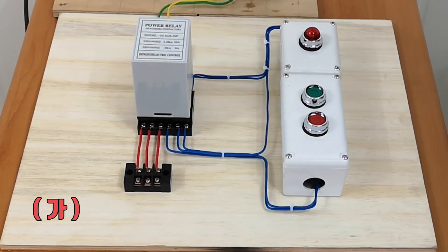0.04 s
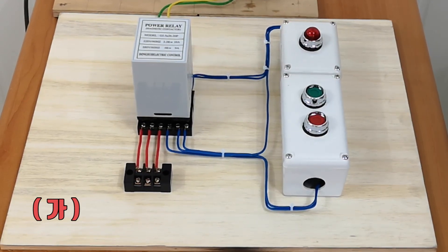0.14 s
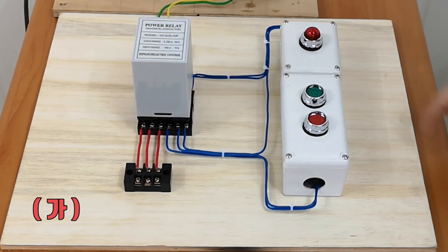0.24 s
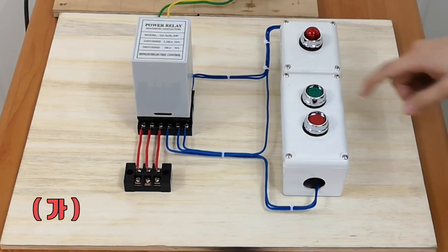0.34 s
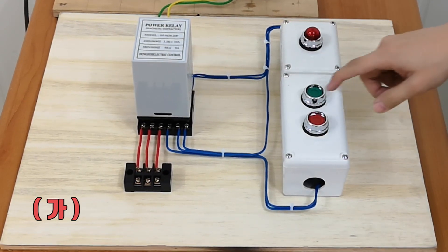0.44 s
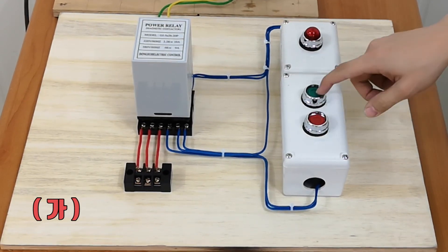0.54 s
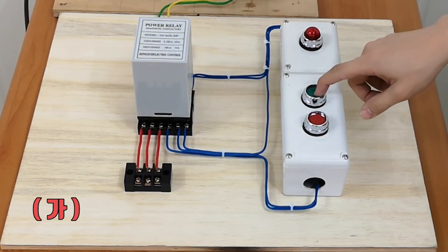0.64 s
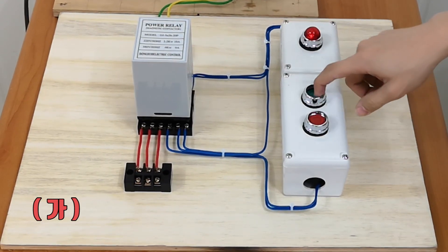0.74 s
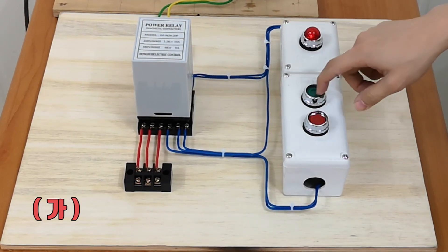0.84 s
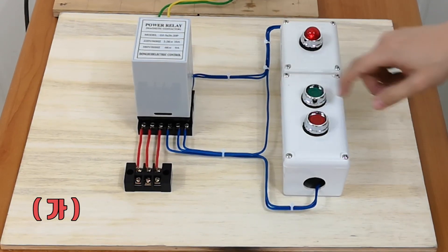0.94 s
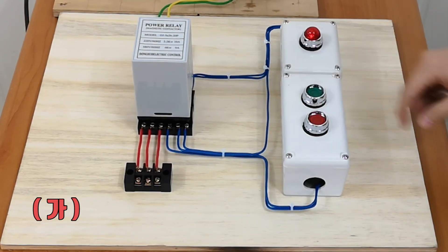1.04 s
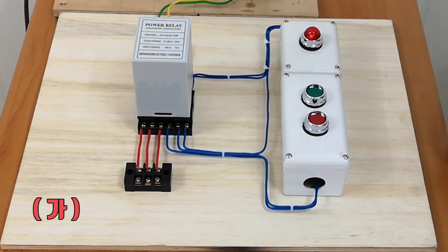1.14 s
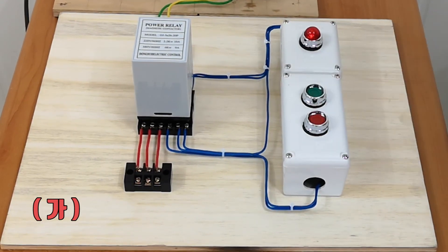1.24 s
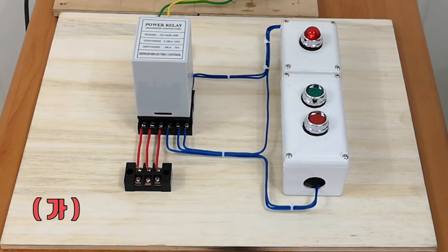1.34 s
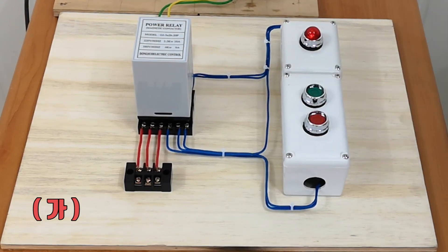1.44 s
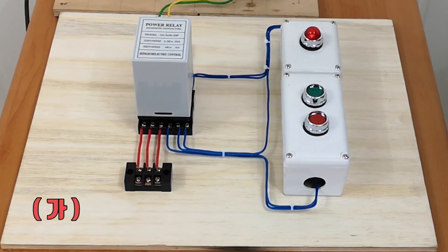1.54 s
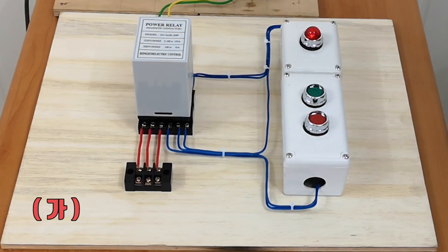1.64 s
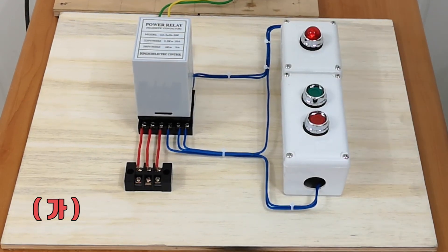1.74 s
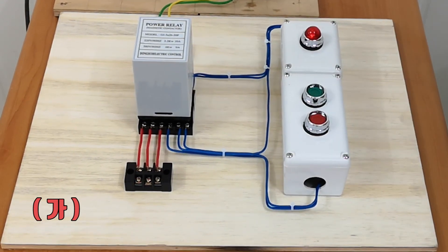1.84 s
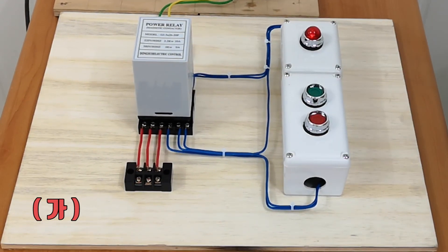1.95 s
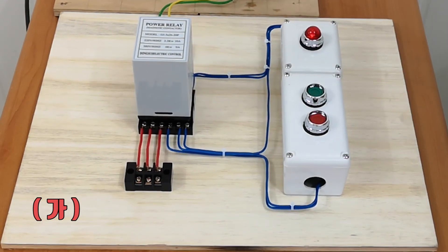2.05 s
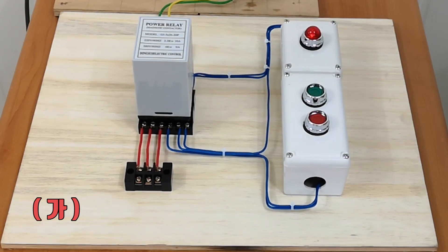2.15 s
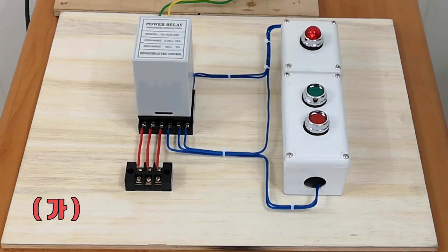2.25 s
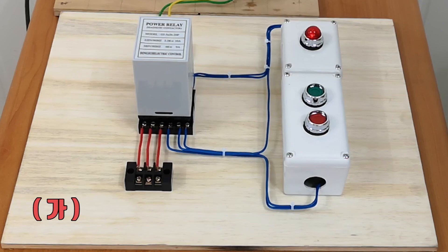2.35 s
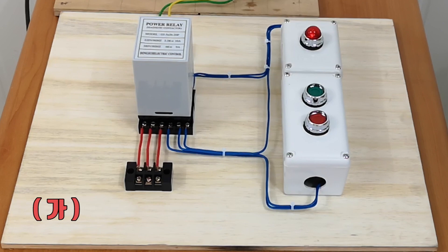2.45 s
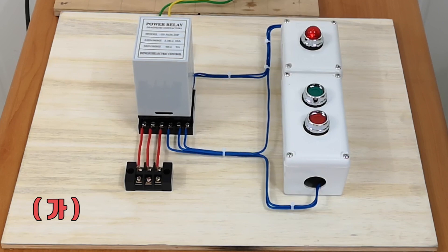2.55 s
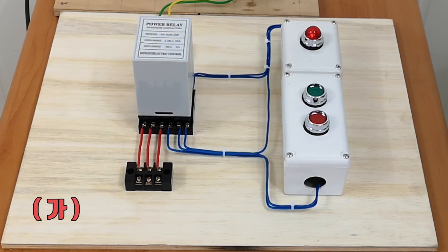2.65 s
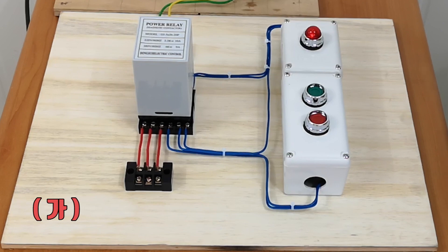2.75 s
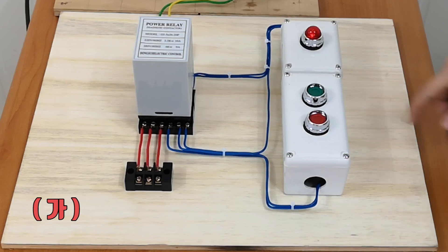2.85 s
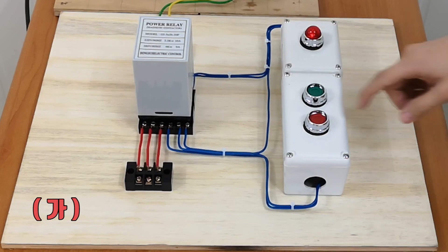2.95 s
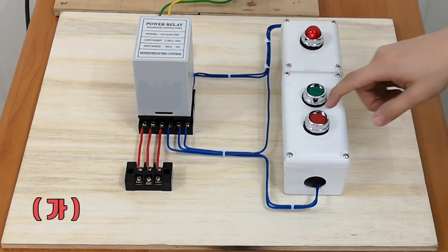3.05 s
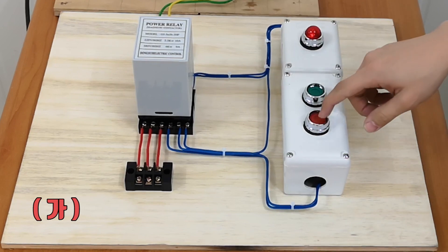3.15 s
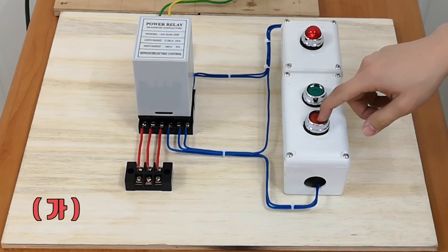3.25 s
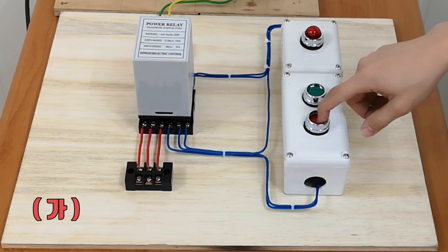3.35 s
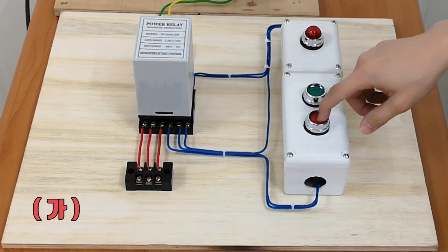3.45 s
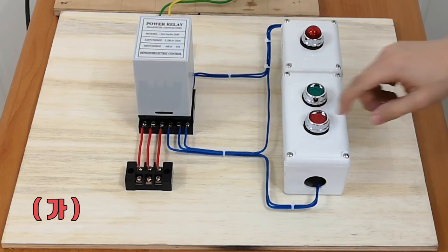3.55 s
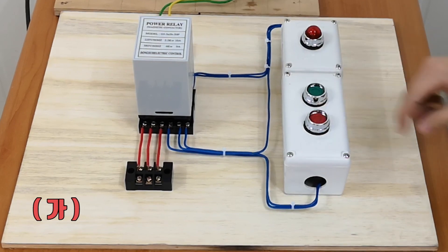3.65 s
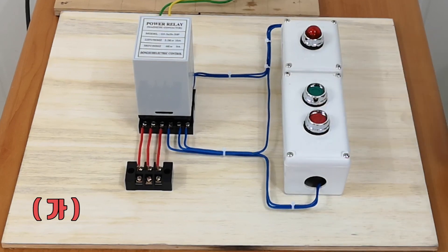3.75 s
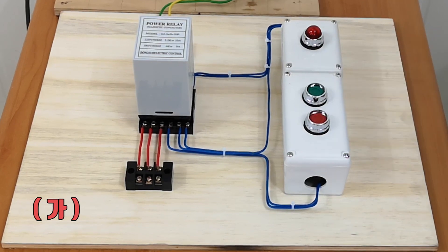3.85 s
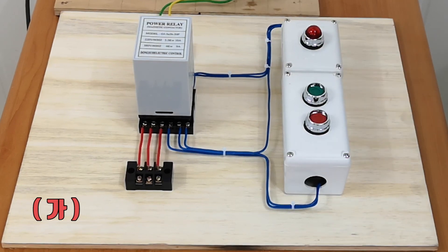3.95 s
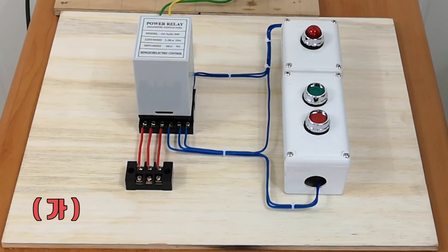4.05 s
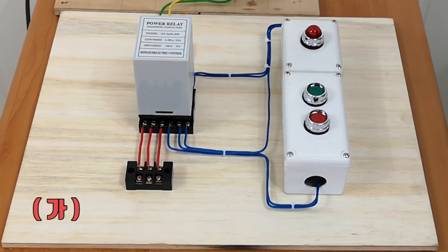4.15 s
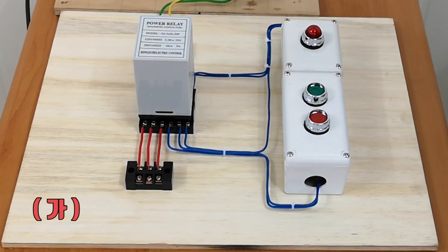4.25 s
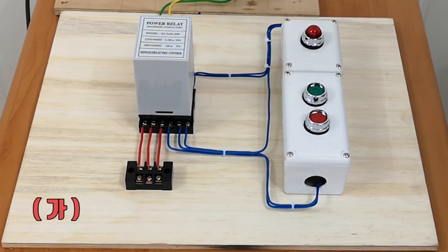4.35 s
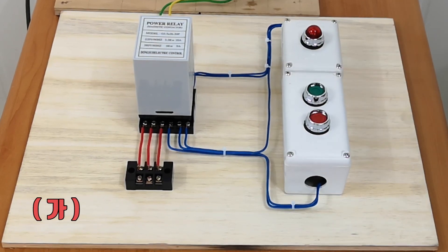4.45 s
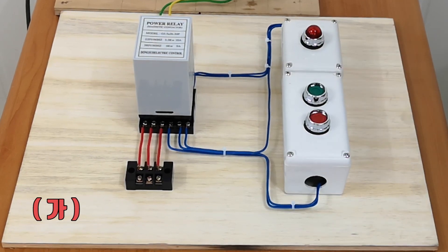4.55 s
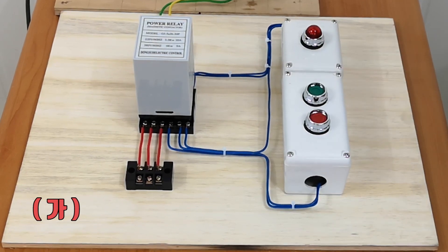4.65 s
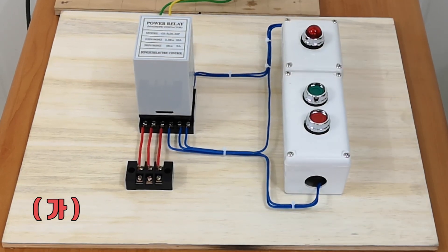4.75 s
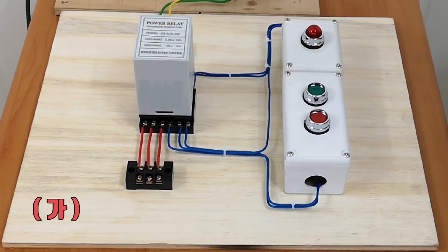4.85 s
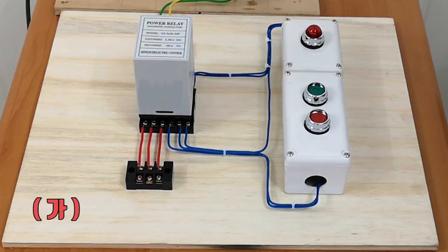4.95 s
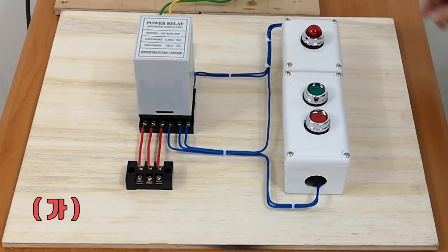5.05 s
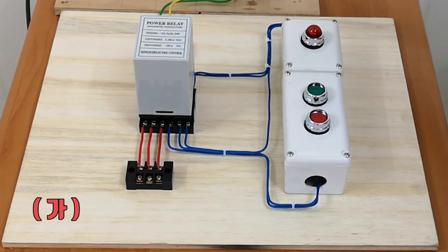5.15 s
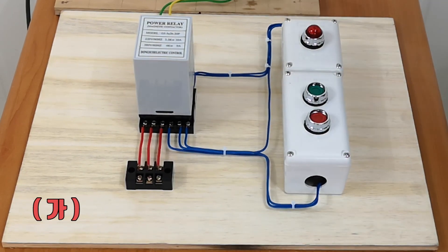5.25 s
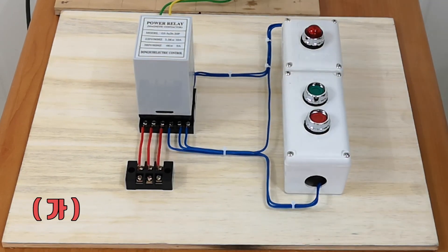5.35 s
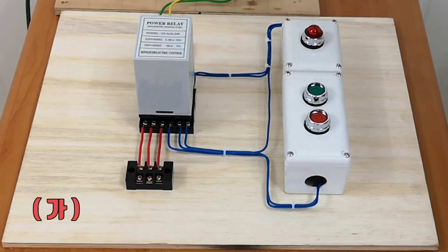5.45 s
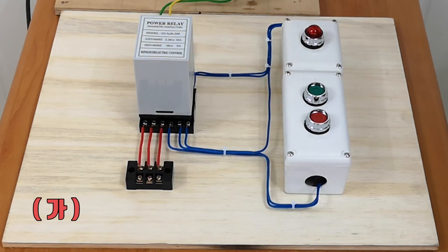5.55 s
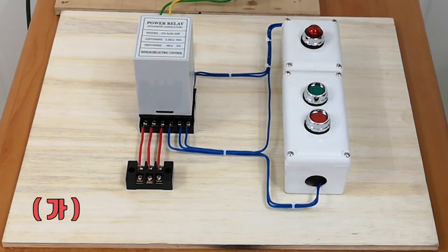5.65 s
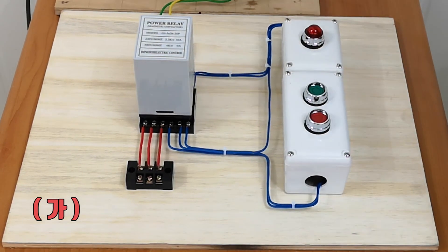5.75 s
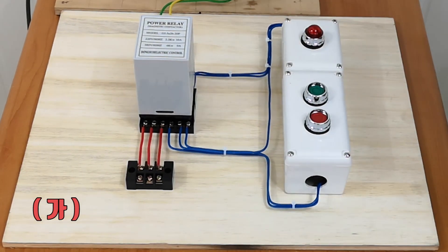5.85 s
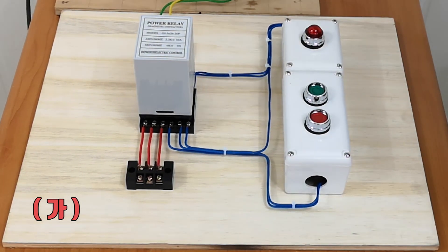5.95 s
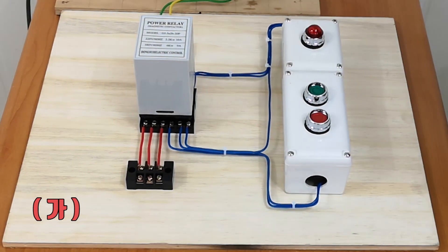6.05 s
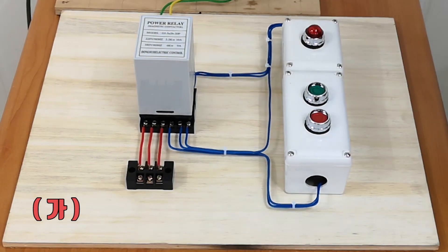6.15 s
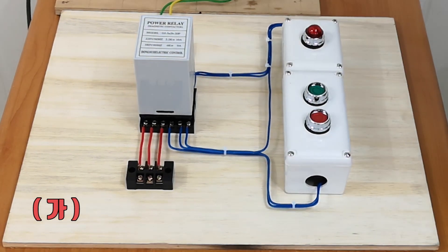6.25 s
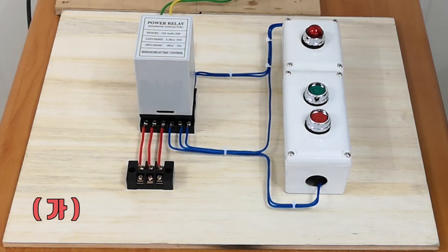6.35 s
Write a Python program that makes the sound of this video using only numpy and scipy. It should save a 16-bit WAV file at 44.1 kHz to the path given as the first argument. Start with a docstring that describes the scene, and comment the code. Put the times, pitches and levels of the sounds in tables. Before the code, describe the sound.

A push button ticks and a power relay pulls in with a loud, solid clack that thumps its wooden board; the button clicks back. After a pause, a second press drops the relay out with a brighter, rattling clack, followed by a springy snap. One more sharp click comes near the end. The sounds are close, with a short echo in a bare room over faint ventilation and electrical hum.

```python
"""Sharp clicks and clacks ring out in a bare room as two push buttons switch a power relay on and off.
Each impact excites the modes of three bodies: the plywood board thumps, the plastic case rattles and
small steel parts ring. On release, the buttons snap back on their springs.
Mains hum and ventilation lie underneath, and the recorder's noise suppressor shortens the echoes."""
import sys
import numpy as np
from scipy import signal
from scipy.fft import rfft, irfft
from scipy.io import wavfile
from scipy.ndimage import uniform_filter1d

SR = 44100
rng = np.random.default_rng(int(sys.argv[2]) if len(sys.argv) > 2 else 0)


def generate_wav(signal):
    """Clip the signal to [-1, 1] and save it as 16-bit WAV at the path in sys.argv[1]."""
    frames = np.transpose(np.atleast_2d(signal))
    scaled = np.clip(frames, -1, 1) * 32767
    pcm = np.round(scaled).astype(np.int16)
    wavfile.write(sys.argv[1], SR, pcm)


N = 282274
T = np.arange(N) / SR
RING_T = np.arange(SR // 5) / SR
SUPPRESS_DB = 7.5


def armature(slide_step_s=.0075, thud_lag_s=.0057, bounce_s=.0135, bounce_fall_db=1.6):
    """Inelastic collision: the armature slides, hits its stop and bounces, less when the magnet holds."""
    # pull-in, then drop-out: impact_s, slide_s, board_db, case_db, steel_db, tilt_db_per_octave, bounce_db
    strokes = [(0.8468, .0225, 3, -0.5, -7.5, -1.5, -20), (3.4069, .008, -8, -1.5, -12.5, 2.5, -4.5)]
    # contact spring modes: pitch_hz, level_db, t60_s
    blade_modes = [(655.4, -2.5, .2), (2170, 0, .2), (2470, -0.5, 0.25), (2676, -2, .2), (13020, -15, .07)]
    out = np.zeros((2, N))
    for impact_s, slide_s, board_db, case_db, steel_db, tilt_db, bounce_db in strokes:
        levels_db = np.array([board_db, case_db, steel_db])
        for k in range(round(slide_s / slide_step_s)):  # chatter along the guides
            chatter = blow(steel_db + np.array([-13, -1.5, -18]), tilt_db, rise_s=.004)
            add(out, impact_s - slide_s + k * slide_step_s, chatter)
        add(out, impact_s, blow(levels_db + (-3, -4.5, 0), tilt_db, rise_s=.002))  # steel meets steel
        thud_s = impact_s + thud_lag_s  # case and board take up the blow
        add(out, thud_s, blow(levels_db + (.5, 0, -9.5), tilt_db, rise_s=.0033))
        first_bounce_db = levels_db + (-2, -.5, -2.5) + bounce_db
        for k in range(4):
            bounce = blow(first_bounce_db - k * bounce_fall_db, tilt_db, rise_s=.004)
            add(out, thud_s + (k + 1) * bounce_s, bounce)
        add(out, thud_s + bounce_s, undb(bounce_db - 9) * ring(blade_modes, RING_T, spread=.3))
    return out


def button_snaps(rebound_s=.009):
    """Release of elastic energy: a button slips its catch, flies to its stop and rebounds once."""
    # double clicks: start_s, flight_s, catch_db (case), then at the stop:
    # board_db, case_db, steel_db, tilt_db_per_octave, spring_db
    snaps = [ (.9315, .0095, -26, -17, -6, -4, -3.5, -7.5), (3.5730, .0085, -14, -19, -8, -0.5, -.8, -5),
             (6.3532, .0060, -5.5, -15.5, -7.5, -4, 2.5, -16), ]
    out = np.zeros((2, N))
    for start_s, flight_s, catch_db, board_db, case_db, steel_db, tilt_db, spring_db in snaps:
        catch = blow((board_db - 9.5, catch_db, steel_db - 9), tilt_db + 1.5, rise_s=.0032)
        add(out, start_s, catch + return_spring(spring_db - 7))
        stop_db = np.array([board_db, case_db, steel_db])
        stop = blow(stop_db, tilt_db, rise_s=.002)
        add(out, start_s + flight_s, stop + return_spring(spring_db))
        rebound = blow(stop_db + (-3.5, -6, -10.5), tilt_db, rise_s=.0015)
        add(out, start_s + flight_s + rebound_s, rebound)
    return out


def button_presses(scrape_lag_s=.0089, plunger_s=.7855, plunger_db=-24):
    """Stick-slip friction: a pushed button ticks, then scrapes on; the start button's plunger rings."""
    # slips under the finger: start_s, level_db, tilt_db_per_octave
    ticks = [(.7210, -34.5, -3.5), (.7650, -33, -3), (0.7834, -23, 1.5), (.8180, -22.5, -1.5),
             (3.3729, -26, 0.5), (6.3505, -22, -1)]
    # modes of the plunger, excited as it passes its catch: pitch_hz, level_db, t60_s
    plunger_modes = [(1538, 0.5, 0.1), (1620, -5, 0.099), (5050, -4.5, .06), (5180, -4.5, .05),
                     (6800, -7, .05), (8230, -5.5, 0.058)]
    out = np.zeros((2, N))
    for start_s, level_db, tilt_db in ticks:
        tick = blow(level_db + np.array([-13.5, -7.5, 1.5]), tilt_db, rise_s=.001)
        scrape = blow(level_db + np.array([-15, -5, -6.5]), tilt_db, rise_s=.0044)
        add(out, start_s, tick)
        add(out, start_s + scrape_lag_s, scrape)
    add(out, plunger_s, undb(plunger_db) * ring(plunger_modes, RING_T, spread=.3))
    return out


def return_spring(level_db, left_right_db=(-4.5, 1.5)):
    """Free vibration: a plucked return spring rings high and to the right."""
    # spring modes: pitch_hz, level_db, t60_s
    modes = [(7290, -4, .08), (9360, -2, 0.02), (9260, 3, 0.035), (9730, 0, 0.045)]
    return undb(level_db) * undb(left_right_db)[:, None] * ring(modes, RING_T, scatter=.0012, spread=1)


def blow(levels_db, tilt_db, rise_s):
    """Impact excitation: one blow sets three bodies vibrating, at levels_db = (board, case, steel)."""
    # modes of plywood board, plastic case, and steel armature and blades: pitch_hz, level_db, t60_s
    board_modes = [(84.55, -12.5, 0.092), (174, -2, 0.062), (222.8, -6, 0.21), (318, -4.5, 0.046)]
    case_modes = [(652, -4.5, 0.023), (879, -3, 0.058), (1177, -3.5, 0.045), (1293, 1.5, 0.036),
                  (1592, -6, 0.087), (1794, -4.5, 0.086), (1960, 0, .04), (2293, -7.5, .04),
                  (3170, -13, .03)]
    steel_modes = [(7340, -2.5, 0.031), (7680, -3, .025), (7920, 0, 0.027), (8540, -7.5, 0.011),
                   (9244, -9.5, .02)]
    # spectra of their dense, quickly damped vibration: frequency_hz, density_db
    case_spectrum = [(100, -7.5), (300, 2), (480, -6.5), (900, -2.5), (1500, 0.5), (2300, -2.5),
                     (3000, -9.5), (4500, -17), (7000, -24.5), (15000, -46)]
    steel_spectrum = [(500, -29), (2500, -12), (4000, -7.5), (6000, -6), (7700, -1), (9500, -2),
                      (10100, -7.5), (12000, -19), (14500, -19.5), (16000, -25)]
    rise = 1 - np.exp(-RING_T / rise_s)  # sliding parts meet gradually
    board = ring(tilted(board_modes, 2.4 * tilt_db), RING_T)
    case_crack = crack(tilted(case_spectrum, tilt_db), t60_s=.028, tail_db=-15, tail_t60_s=.1)
    case_ring = ring(tilted(case_modes, tilt_db), RING_T, scatter=.0073, spread=.2)
    case = unit(rise * (case_crack + undb(-5) * case_ring))
    steel_crack = crack(tilted(steel_spectrum, tilt_db), t60_s=.029, tail_db=-17, tail_t60_s=.084)
    steel_ring = ring(tilted(steel_modes, tilt_db), RING_T, scatter=.014, spread=.94)
    steel = unit(rise * (steel_crack + undb(-5) * steel_ring))
    return sum(gain * part for gain, part in zip(undb(levels_db), (board, case, steel)))


def ring(modes, t, scatter=0, spread=0):
    """Modal superposition: damped sines; scatter detunes them, spread varies their phase per channel."""
    out = 0
    for pitch_hz, level_db, t60_s in modes:
        detuned_hz = pitch_hz * (1 + scatter * rng.standard_normal())
        phase = spread * rng.uniform(-np.pi, np.pi, (2, 1))
        mode = np.sin(2 * np.pi * detuned_hz * t + phase) * undb(-60 * t / t60_s)
        out = out + undb(level_db) * unit(mode)
    return unit(out)


def crack(spectrum, t60_s, tail_db, tail_t60_s):
    """Modal overlap: dense modes merge into a noise burst, with a tail scattered off board and bench."""
    envelope = undb(-60 * RING_T / t60_s) + undb(tail_db - 60 * RING_T / tail_t60_s)
    return unit(colour(diffuse(len(RING_T), alike_hz=2500) * envelope, spectrum))


def tilted(table, tilt_db):
    """Spectral tilt in dB per octave: hard blows favour the upper modes, dull blows the lower."""
    return [(hz, db + tilt_db * np.log2(hz / table[0][0]), *rest) for hz, db, *rest in table]


def board_radiation(x, cutoff_hz=72):
    """Radiation efficiency: a board small against the wavelength gives off no deep bass."""
    return signal.sosfilt(signal.butter(4, cutoff_hz, "highpass", fs=SR, output="sos"), x)


def room(x, build_s=.012):
    """Reverberation: echoes thicken after a blow and die away, treble first; standing waves sing on."""
    # diffuse echoes against the direct sound: frequency_hz, level_db, t60_s
    bands = [(80, 0.5, 0.71), (177, -4.5, 1.4), (355, 2, 1), (600, 7, 0.78), (1196, 1, 0.94),
             (2200, 1.5, 0.98), (4500, -2.5, 0.72), (8040, -6.5, 0.46), (15000, -10, 0.39)]
    # standing waves: pitch_hz, level_db, t60_s
    room_modes = [(90.8, -5.5, .6), (132, -1.5, 0.98), (157, -4.5, 0.91), (202.3, 3.5, 0.92),
                  (216, -5.5, 1), (300, -11.5, 0.96), (316, -5.5, .8), (350, -9.5, 1), (651, -7.5, .8),
                  (1128, -5, 0.64)]
    size = 3 * SR // 2
    t, f = np.arange(size) / SR, np.fft.rfftfreq(size, 1 / SR)
    noise = rfft(diffuse(size, alike_hz=560.4))
    log_centres = np.log([row[0] for row in bands])
    response = undb(-17) * ring(room_modes, t)
    for (_, level_db, t60_s), band_weights in zip(bands, np.eye(len(bands))):
        band = irfft(noise * np.interp(np.log(f + 1), log_centres, band_weights), size)
        envelope = (1 - np.exp(-(t / build_s) ** 2)) * undb(-60 * t / t60_s)
        response = response + undb(level_db) * band * unit(envelope)
    return signal.fftconvolve(x, response, axes=1)[:, :N]


def ventilation(level_db=-58):
    """Broadband noise: moving air rumbles and hisses at a slowly wavering level."""
    # air noise spectrum: frequency_hz, density_db
    spectrum = [(10, -8.5), (25, 1.5), (82, -3.5), (128, -12), (200, -18), (270, -21.5), (390, -29),
                (555, -34), (1020, -32), (2400, -32), (4000, -40.5), (8000, -45), (11500, -51),
                (15000, -66)]
    air = unit(colour(diffuse(N, alike_hz=615), spectrum)) * np.sqrt(N)
    return air * undb(level_db + .5 * drift(1.9))


def mains_hum(waver_db=1.0, wander_rad=.18):
    """Line spectrum: hum partials and faint whines, each wavering gently in level and phase."""
    # steady tones: pitch_hz, level_db
    tones = [(118.4, -71.5), (236.5, -74), (357, -88), (470, -92), (1017, -93.5), (1798, -92.5),
             (2530, -95.5), (7822, -102)]
    hum = 0
    for pitch_hz, level_db in tones:
        amplitude = np.sqrt(2) * undb(level_db + waver_db * drift(7.2))
        hum = hum + amplitude * np.sin(2 * np.pi * pitch_hz * T + wander_rad * drift(1.4))
    return hum


def diffuse(size, alike_hz):
    """Diffuse-field coherence: noise at two microphones is alike in the bass, unrelated in the treble."""
    f = np.fft.rfftfreq(size, 1 / SR)
    coherence = np.sinc(f / alike_hz) / (1 + (f / alike_hz / 2) ** 2)
    mid, side = rfft(rng.standard_normal((2, size)))
    mid, side = mid * np.sqrt((1 + coherence) / 2), side * np.sqrt((1 - coherence) / 2)
    return irfft(np.array([mid + side, mid - side]), size)


def colour(x, points):
    """Minimum-phase filtering through points of frequency_hz, gain_db."""
    size = 2 * x.shape[-1]
    hz, db = np.transpose(points)
    f = np.fft.rfftfreq(size, 1 / SR)
    gain = undb(np.interp(np.log(f + 1), np.log(hz), db))
    cepstrum = irfft(np.log(gain))
    cepstrum[1:size // 2] *= 2  # folding the cepstrum makes the filter causal
    cepstrum[size // 2 + 1:] = 0
    return irfft(rfft(x, size) * np.exp(rfft(cepstrum)))[..., :size // 2]


def drift(rate_hz):
    """Slow modulation: smoothed random steps with a spread near 1."""
    hold = int(SR / rate_hz)
    steps = np.repeat(rng.standard_normal(N // hold + 1), hold)
    return 1.5 * uniform_filter1d(uniform_filter1d(steps, hold), hold)[:N]


def undb(db):
    """Decibels to amplitude ratio."""
    return 10 ** (np.asarray(db) / 20)


def unit(x):
    """Normalisation to unit energy, averaged over the channels."""
    return x / np.sqrt(np.mean(np.sum(x ** 2, axis=-1)))


def add(out, start_s, sound):
    """Superposition: a sound joins the mix at start_s."""
    place = out[:, int(start_s * SR):][:, :sound.shape[-1]]
    place += sound[:, :place.shape[-1]]


def scene():
    """Direct and reverberant fields of the clacks add to the steady background."""
    clacks = board_radiation(button_presses() + armature() + button_snaps())
    echoes = room(clacks)
    background = (ventilation() + mains_hum()) * undb(SUPPRESS_DB)  # the suppressor takes this gain off
    return clacks + echoes + background


def suppress(x, open_db=4, knee_db=10):
    """Spectral gating: bands that sink towards their median level are turned down."""
    _, _, frames = signal.stft(x, nperseg=512)
    power = np.mean(np.abs(frames) ** 2, axis=0)
    power = uniform_filter1d(power, size=15, axis=0)  # across frequency
    power = np.maximum(uniform_filter1d(power, size=3, axis=1), 1e-20)  # across time
    above_db = 10 * np.log10(power / np.median(power, axis=1, keepdims=True))
    shut = np.clip(1.5 - (above_db - open_db) / knee_db, 0, 1)
    return signal.istft(frames * undb(-SUPPRESS_DB * shut))[1][:, :N]


def record(dry):
    """Gating and band limiting: the recorder suppresses steady noise and cuts the top."""
    lowpass = signal.ellip(8, .2, 70, 15400, fs=SR, output="sos")
    return signal.sosfilt(lowpass, suppress(dry))


dry = scene()
out = record(dry)
generate_wav(out)
```